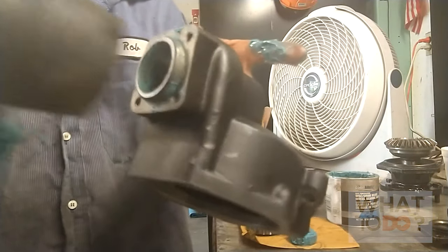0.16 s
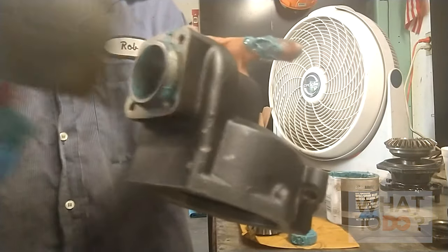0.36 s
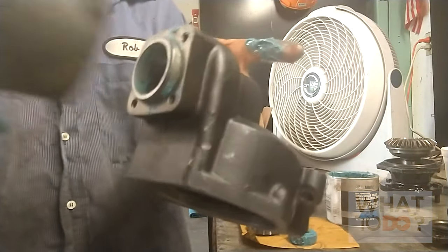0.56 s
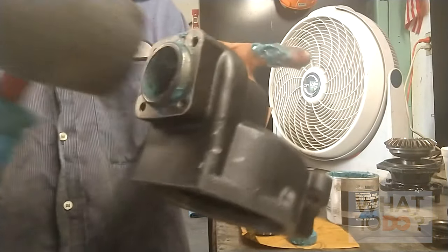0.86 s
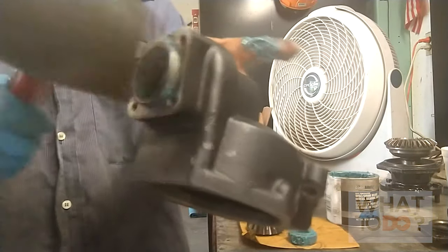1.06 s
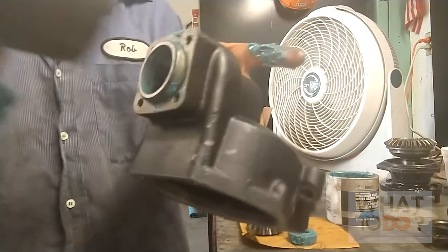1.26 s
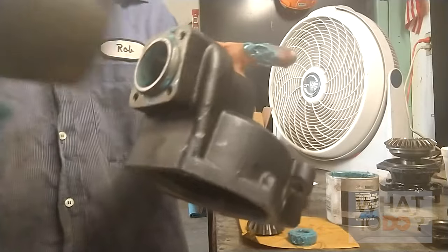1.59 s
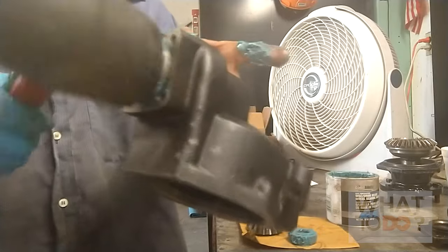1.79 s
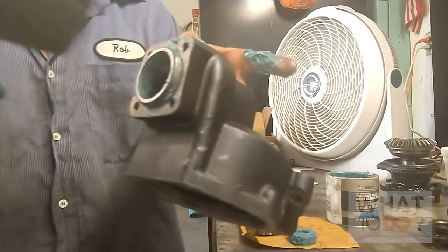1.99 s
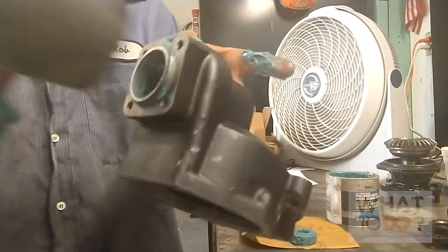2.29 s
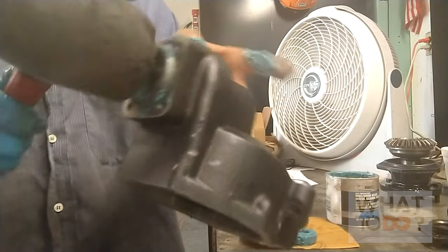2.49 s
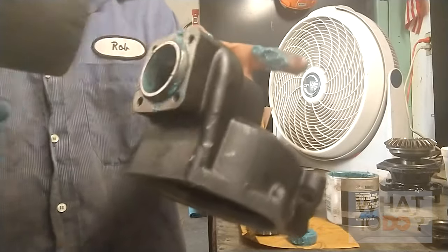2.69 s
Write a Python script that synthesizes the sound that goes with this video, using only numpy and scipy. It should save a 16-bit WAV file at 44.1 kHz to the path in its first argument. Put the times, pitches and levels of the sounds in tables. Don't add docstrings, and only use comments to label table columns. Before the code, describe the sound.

Close up in a small workshop, eight regular mallet taps land on a hand-held metal gear case, each a hollow knock, sharp crack and brief ring, with faint greasy slips between them over quiet fan air.

```python
import sys
import numpy as np
from scipy import signal
from scipy.fft import rfft, irfft
from scipy.io import wavfile
from scipy.ndimage import uniform_filter1d

SR = 44100
rng = np.random.default_rng(int(sys.argv[2]) if len(sys.argv) > 2 else 0)


def linear_from_db(decibels):
    return 10 ** (np.asarray(decibels, float) / 20)


def generate_wav(sig):
    pcm = np.round(np.clip(np.atleast_2d(sig).T, -1, 1) * 32767).astype(np.int16)
    wavfile.write(sys.argv[1], SR, pcm)


N = 125685
SIDES = np.array([[0.5], [-0.5]])


def colour(x, points):
    p, n = np.array(points), x.shape[-1]
    f = np.maximum(np.arange(n // 2 + 1) * SR / n, 1)
    gain_db = np.interp(np.log(f), np.log(p[:, 0]), p[:, 1])
    return irfft(rfft(x) * linear_from_db(gain_db), n)


def unit(x):
    return x / np.sqrt(np.mean(x ** 2))


def decay(t, t60):
    return np.exp(-np.log(1000) * t / t60)


def shape(t, rise, t60):
    t = np.maximum(t, 0)
    return (1 - np.exp(-(t / rise) ** 2)) * decay(t, t60)


def walk(rate):
    k = int(SR / rate)
    return unit(uniform_filter1d(uniform_filter1d(rng.standard_normal(N), k), k))


def filtered(x, order, hz, kind):
    return signal.sosfilt(signal.butter(order, hz, kind, fs=SR, output="sos"), x)


def place(out, at, sound):
    i = int(at * SR)
    out[:, i:i + sound.shape[1]] += sound


def fan():
    # frequency in Hz, level in dB per Hz.
    rush_mid = [(40, -7), (260, -5), (640, -6), (1300, -16), (2500, -20.5), (5200, -26.5), (7500, -40),
                (16000, -57)]
    # frequency in Hz, level in dB per Hz.
    rush_side = [(40, -19), (300, -5.5), (600, -9.5), (1300, 4.5), (2500, -13), (5200, -50), (7500, -49),
                 (16000, -35)]
    # frequency in Hz, level in dB, wobble in dB.
    hum = [(58.4, -67, 0), (113.4, -66, 3), (167.6, -69, 0.5), (220, -68.5, -3)]
    flicker_db, left_first, pan_db = 3, 4, -2.2
    t, rush = np.arange(N) / SR, np.zeros((2, N))
    for hz in 45 * 2.0 ** np.arange(9):
        octave = filtered(rng.standard_normal((2, N)), 2, [hz / np.sqrt(2), hz * np.sqrt(2)], "bandpass")
        rush = rush + octave * linear_from_db(flicker_db * walk(10.7))
    mid = linear_from_db(-52.5) * unit(colour(rush[0], rush_mid))
    for hz, db, wobble_db in hum:
        level = linear_from_db(db + 6 + wobble_db * walk(7.2))
        mid = mid + level * np.sin(2 * np.pi * hz * t + 1.3 * walk(2.5))
    side = linear_from_db(-61.5) * unit(colour(rush[1], rush_side))
    return np.array([np.roll(mid, -left_first) + side, mid - side]) * linear_from_db(pan_db * SIDES)


def room(t):
    # frequency in Hz, level in dB.
    tone = [(150, 5.5), (700, 0), (1100, -2), (1700, -5), (3000, -0.5), (7000, -7.5), (11000, -4.5),
            (16000, -3.5)]
    build_s, t60_s, far_s, far_t60_s = 0.0031, 0.77, 0.061, 1
    alike = 0.37
    noise = rng.standard_normal((3, len(t)))
    noise = colour(alike * noise[2] + noise[:2], tone)
    tail = noise * shape(t, build_s, t60_s) * decay(np.maximum(t - far_s, 0), far_t60_s)
    return tail / np.sqrt(np.sum(tail ** 2) / 2)


def tick(t, hz):
    band = [(hz / 2, -30), (hz / 2.4, -3), (hz, -3), (hz * 1.8, -30)]
    return unit(colour(rng.standard_normal((2, len(t))), band)) * shape(t, 0.002, 0.018)


def slide(t, length, hz, octaves):
    sag_t60_s, stop_t60_s, grain_db = 0.62, 0.46, 0.7
    band = [(hz * 2 ** (-3 * octaves), -30), (hz * 2 ** -octaves, -4), (hz, 0),
            (hz * 2 ** octaves, -4), (hz * 2 ** (3 * octaves), -30)]
    grit = linear_from_db(grain_db * walk(150)[:len(t)])
    env = shape(t, 0.0038, sag_t60_s) * decay(np.maximum(t - length, 0), stop_t60_s)
    return unit(colour(rng.standard_normal((2, len(t))), band)) * grit * env


def hollow(t, pitch, partials):
    out = 0
    for ratio, db, t60, pan_db, lead in partials:
        turn = rng.standard_normal((3, 1))
        phase = 0.72 * turn[2] + 0.11 * turn[:2] + lead * SIDES
        env = linear_from_db(db + pan_db * SIDES) * shape(t, 0.0015, t60)
        out = out + env * np.sin(2 * np.pi * ratio * pitch * t + phase)
    return out


def bench_thump(t):
    # frequency in Hz, level in dB, t60 in s, left-right in dB, left leads in rad.
    bump = [(105.7, -3.5, 0.079, 5, 0.2), (187, -2.5, 0.056, 1, 0.28), (286, -2, 0.1, 6, 0.31)]
    return hollow(t, 0.99, bump)


def crack(t):
    # frequency in Hz, level in dB per Hz.
    tone = [(1200, -4), (2200, -4.5), (3300, 1.5), (5300, -4), (8000, 2.5), (13000, -10), (15600, -13.5),
            (16800, -21)]
    rise_s, t60_s = 0.00088, 0.027
    return unit(colour(rng.standard_normal((2, len(t))), tone)) * shape(t, rise_s, t60_s)


def thud(t):
    # frequency in Hz, level in dB, t60 in s, left-right in dB, left leads in rad.
    body = [(175, -1.5, 0.021, -9, 1), (284, 6, 0.02, -3, 0.87), (419, -2, 0.021, -2.5, 0.93)]
    return filtered(hollow(t, 0.895, body), 2, 134, "highpass")


def knock(t, hz):
    # ratio to knock pitch, level in dB, t60 in s, left-right in dB, left leads in rad.
    partials = [(0.759, -8.5, 0.014, -12.5, 0.58), (0.871, -8, 0.029, 0.5, 0.57),
                (0.983, 1.5, 0.019, 3.5, 0.26), (1.107, 2, .015, -3.5, 1), (1.45, -2.5, 0.016, -1.5, 0.94),
                (1.749, 1.5, 0.011, -8.5, 0.88), (2.199, -12, 0.013, 11, 0.42)]
    return hollow(t, hz, partials)


def mode(t, hz, t60, grip_db, pan_db, lead, db):
    rise_s, grip_t60_s = 0.0016, 0.074
    tremor_db, tremor_rad, tremor_at_hz, steps = 3.5, 1.86, 7400, 50
    turn, shake = rng.standard_normal(), rng.standard_normal((2, steps))
    env = shape(t, rise_s, t60) + linear_from_db(grip_db) * shape(t, rise_s, grip_t60_s)
    depth = min(hz / tremor_at_hz, 1) ** 0.98
    times = np.linspace(0, t[-1], steps)
    tremor, slip = (np.interp(t, times, (s - s[0]) * depth) for s in shake)
    level = linear_from_db(db + tremor_db * tremor + pan_db * SIDES)
    return level * env * np.sin(2 * np.pi * hz * t + turn + tremor_rad * slip + lead * SIDES)


def rings(t, tap):
    wall_hz = [1764, 2560, 2678, 2722, 2760]
    lug_hz = [4095, 4282, 4414]
    ribs_hz = [4622, 4698, 4728, 4830]
    boss_hz = [5520, 5630, 5670]
    race_hz = [6570, 6848, 7250, 7446, 7690]
    cage_hz = [8500, 8580, 9507, 9870, 10218]
    cage_top_hz = [10534, 10790, 11505, 12000, 13720]
    # t60 in s, extra under the mallet in dB, left-right in dB, left leads in rad.
    wall = [(0.17, 4, -5.5, 0.6), (0.51, 5, -1.5, 2), (0.43, 4.5, -5, -1), (0.4, 4, -4, -0.7),
            (0.65, 11.5, 0.5, -1.76)]
    lug = [(0.48, 4, -0.1, -6), (0.48, 31.5, 0.5, 1.2), (0.54, 0, 1.6, 7)]
    ribs = [(0.16, 24.5, 8, 2.7), (1, 19, 6, -1.2), (0.67, -24, 5, 1.4), (0.35, 6, 31, 1.3)]
    boss = [(0.77, 8.2, -4.0, 8), (0.41, 21, 2.5, 0), (0.65, 8.9, 2, 1.8)]
    race = [(0.73, 19, -16.5, 1.7), (0.37, -1, 8, 2.2), (0.5, 16, -29, 3.1), (0.46, 14.5, 7.5, 2),
            (0.35, 1, 2, 0.46)]
    cage = [(0.72, 2, 5.2, 2.5), (0.24, -10, 0.1, 3), (0.44, 29.5, 1.6, 1.6), (0.38, 22, 4.5, 0.6),
            (0.2, -2, 4.1, 2.7)]
    cage_top = [(0.24, 6, -5, -0.73), (0.15, -1, 23, -0.03), (0.27, 7, -13, 1.3), (0.14, 17, 11, 1.7),
                (0.16, 14, 13, 0.04)]
    # one tap, the level of each mode in dB.
    wall_db = [(-42.5, -47, -77, -59, -68), (-43.5, -46, -47, -55, -39.5), (-43.5, -54, -54, -51, -41.5),
               (-33, -40.5, -67, -39.5, -37.5), (-34, -35, -71, -50, -46), (-32, -47, -63, -58, -63),
               (-34, -41, -54, -39.5, -42.5), (-37, -41, -46, -40.5, -39)]
    lug_db = [(-78, -86, -85), (-70, -64, -74), (-77, -61, -77), (-55, -56, -52), (-74, -69, -87),
              (-75, -63, -79), (-69, -52, -73), (-76, -70.5, -93)]
    ribs_db = [(-77, -76, -72, -78), (-54, -63.5, -60, -71), (-58, -64, -73, -69),
               (-49.5, -48.5, -42, -46.5), (-62, -58.5, -56, -65), (-53, -57, -58, -61),
               (-61, -62, -66, -71), (-72, -66, -64, -67)]
    boss_db = [(-84, -74, -73), (-62.5, -60, -63), (-75, -74, -74), (-57, -51, -47), (-57, -58.5, -60),
               (-51, -50.5, -45), (-54, -56.5, -59), (-60, -58, -60)]
    race_db = [(-85, -69, -94, -69, -82), (-75, -58, -85, -59, -65), (-86, -62, -97, -87, -83),
               (-59.5, -51, -70, -54, -66), (-63, -38.5, -52.5, -36.5, -43),
               (-56.5, -49.5, -67, -47.5, -57), (-55, -43, -58.5, -45, -49), (-64, -58, -70, -58.5, -75)]
    cage_db = [(-86, -82, -87, -81, -74), (-60, -74, -77, -72, -54), (-79, -76, -89, -83, -60),
               (-56.5, -65, -61, -58.5, -51), (-51, -67, -63, -61, -48), (-57, -57, -63, -61, -58),
               (-48, -50, -52.5, -64, -47), (-81, -68, -93, -87, -65)]
    cage_top_db = [(-73, -77, -91, -89, -87), (-68, -75, -91, -87, -77), (-70, -69, -79, -78, -78),
                   (-59, -57, -85, -65, -66), (-45, -42.5, -50, -43.5, -50), (-57, -59, -70, -63, -82),
                   (-43.5, -52, -82, -59, -62), (-76, -66, -86, -60.5, -74)]
    parts = [(wall_hz, wall, wall_db), (lug_hz, lug, lug_db), (ribs_hz, ribs, ribs_db),
             (boss_hz, boss, boss_db), (race_hz, race, race_db), (cage_hz, cage, cage_db),
             (cage_top_hz, cage_top, cage_top_db)]
    out = 0
    for pitches, ringing, levels in parts:
        for hz, settings, db in zip(pitches, ringing, levels[tap]):
            out = out + mode(t, hz, *settings, db)
    return out


def scene():
    # start in seconds, level in dB, centre in Hz.
    ticks = [
        (0.813, -57, 14000),
        (1.44, -50, 7200),
        (2.102, -50, 10000),
    ]
    # start in s, length in s, level in dB, centre in Hz, width in octaves.
    slides = [
        (1.16, 0.08, -54.5, 6160, 0.36),
        (1.5, 0.075, -46.5, 9500, 0.21),
        (1.501, 0.062, -49, 12500, 0.22),
        (1.886, 0.05, -58, 8500, 0.25),
        (2.213, 0.075, -43, 8030, 0.19),
        (2.555, 0.06, -67, 6400, 0.37),
    ]
    # seconds ago, level in dB, centre in Hz, width in octaves.
    earlier = (.02, -61, 5800, .3)
    # start in seconds, level in dB.
    bench_thumps = [
        (0.529, -45),
        (0.878, -41),
        (1.2, -39.5),
        (1.585, -40.5),
        (2.278, -38),
        (2.629, -45),
    ]
    # start in seconds, knock in dB, knock in Hz, thud in dB, crack in dB.
    taps = [
        (0.1285, -21.5, 940, -24.5, -42.5),
        (0.479, -20.5, 954, -27.5, -29.5),
        (.826, -20.5, 1000, -29.5, -34.5),
        (1.155, -14.5, 976, -27, -23.5),
        (1.4976, -8, 918, -25, -24.5),
        (1.876, -18, 1115, -28.5, -21.5),
        (2.218, -12.5, 936, -34, -22),
        (2.562, -16, 1067, -28.5, -30),
    ]
    room_db, ring_room_db = -12, -2.5
    out, span = np.zeros((2, N + SR)), int(0.5 * SR)
    t = np.arange(span) / SR
    for at, db, hz in ticks:
        place(out, at, linear_from_db(db) * tick(t, hz))
    for at, length, db, hz, octaves in slides:
        place(out, at, linear_from_db(db) * slide(t, length, hz, octaves))
    ago, db, hz, octaves = earlier
    place(out, 0, linear_from_db(db) * slide(t + ago, 0.079, hz, octaves))
    for at, db in bench_thumps:
        place(out, at, linear_from_db(db) * bench_thump(t))
    for tap, (at, knock_db, hz, thud_db, crack_db) in enumerate(taps):
        blow = linear_from_db(knock_db) * knock(t, hz) + linear_from_db(thud_db) * thud(t) + linear_from_db(crack_db) * crack(t)
        ring = rings(t, tap)
        into_room = blow + linear_from_db(ring_room_db) * ring
        answer = signal.fftconvolve(into_room, room(t), axes=1)[:, :span]
        place(out, at - 0.0008, blow + ring + linear_from_db(room_db) * answer)
    return out[:, :N] + fan()


def low_pass(x):
    return signal.sosfilt(signal.butter(12, 16830, fs=SR, output="sos"), x)


def record(dry):
    hiss = filtered(rng.standard_normal(dry.shape), 8, 15800, "lowpass")
    x = filtered(dry + linear_from_db(-75) * hiss, 5, 48, "highpass")
    x = filtered(x, 8, 16650, "lowpass")
    return low_pass(x)


dry = scene()
out = record(dry)
generate_wav(out)
```